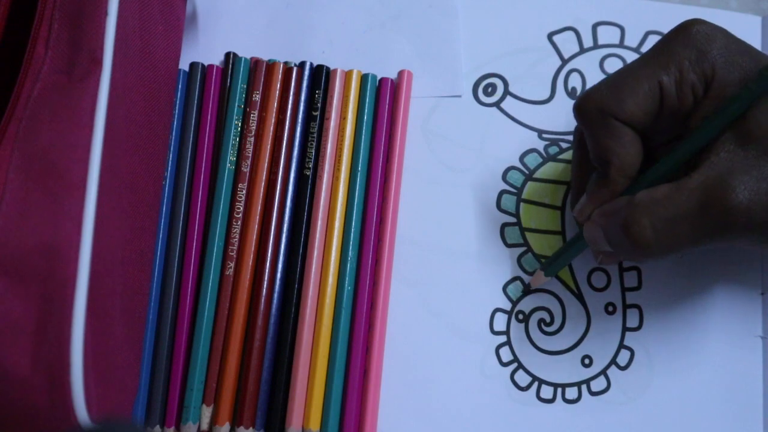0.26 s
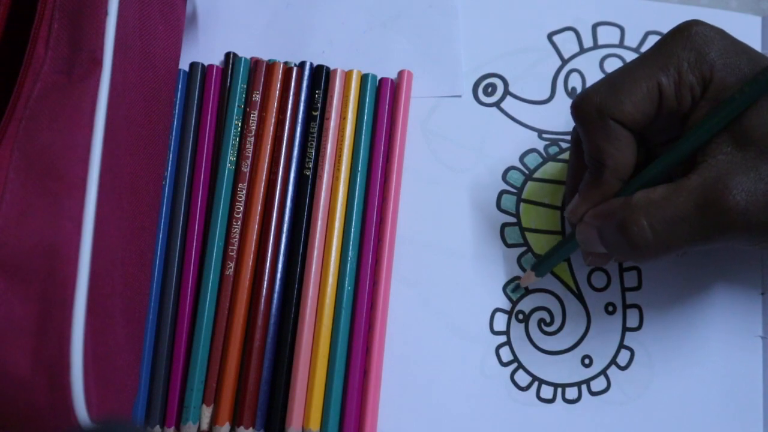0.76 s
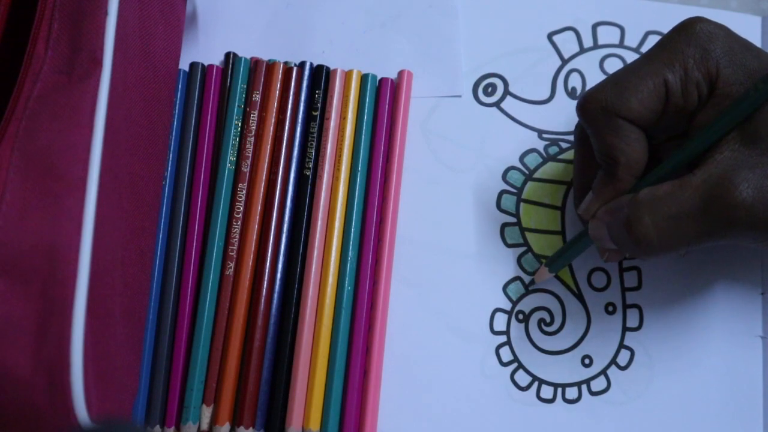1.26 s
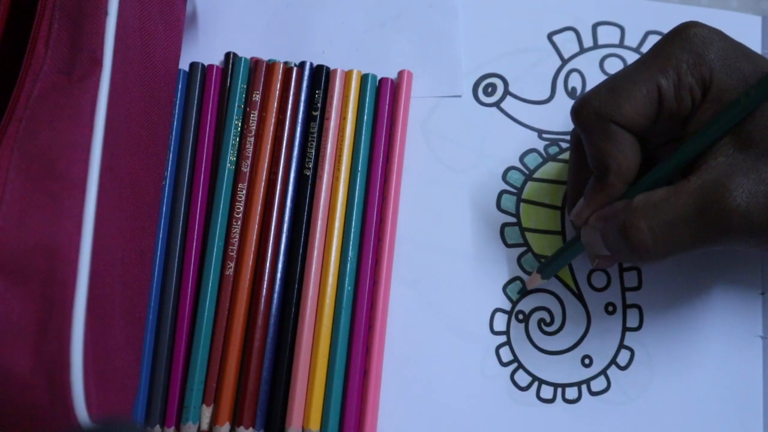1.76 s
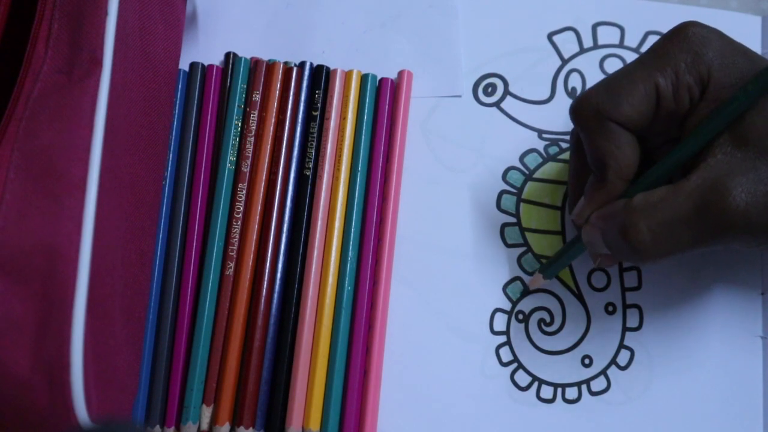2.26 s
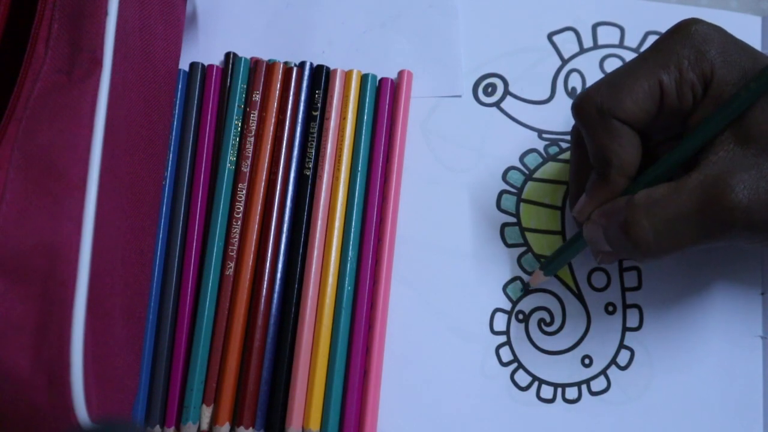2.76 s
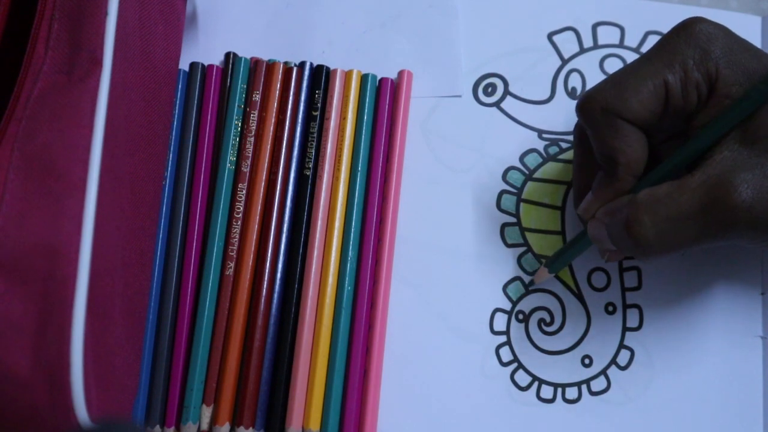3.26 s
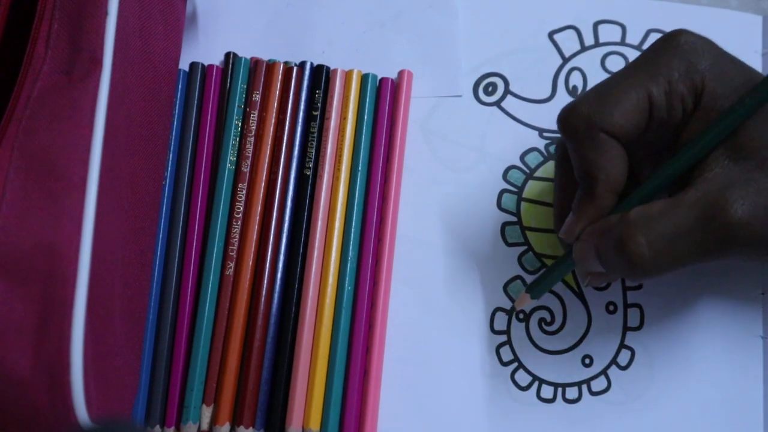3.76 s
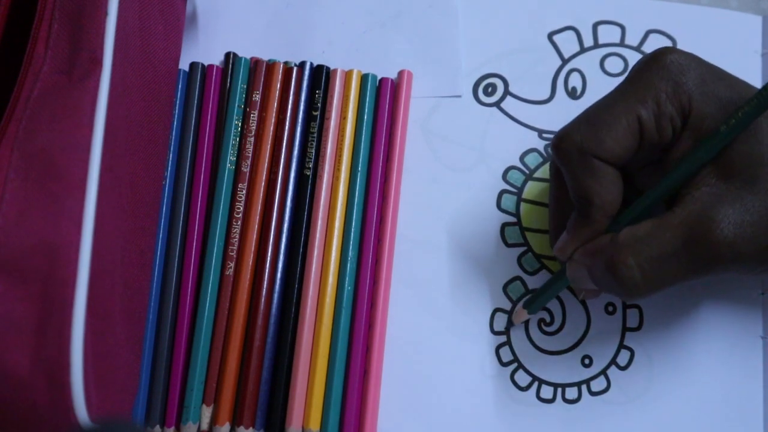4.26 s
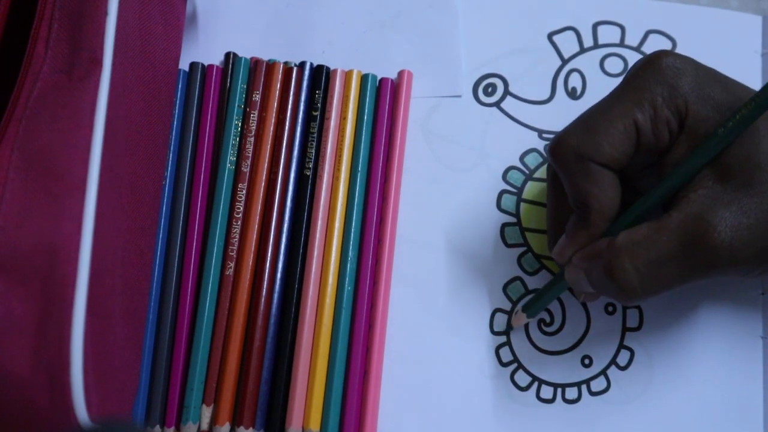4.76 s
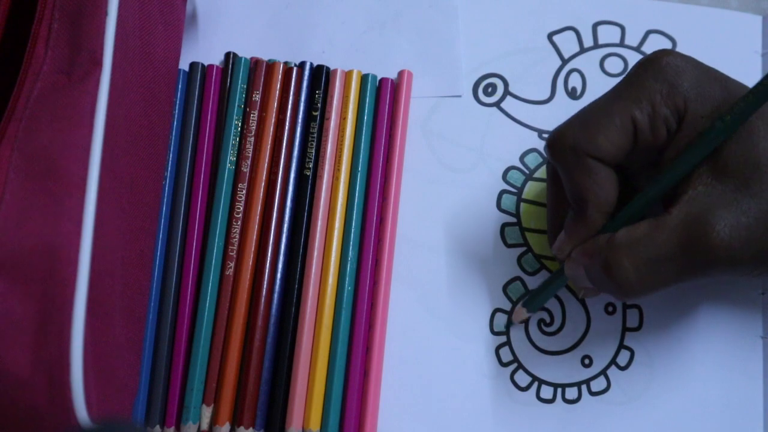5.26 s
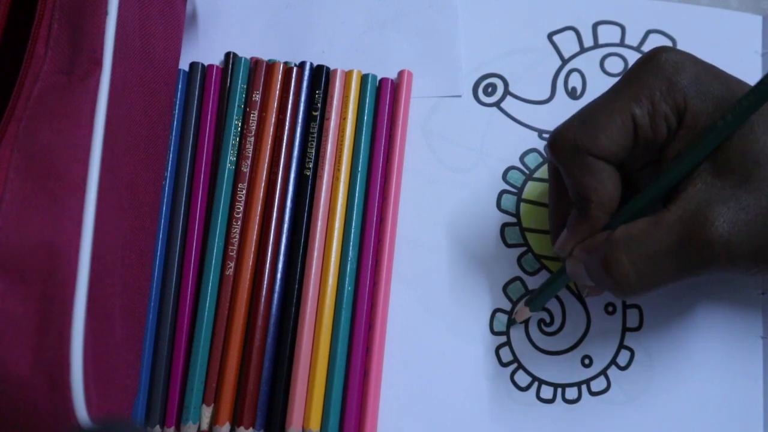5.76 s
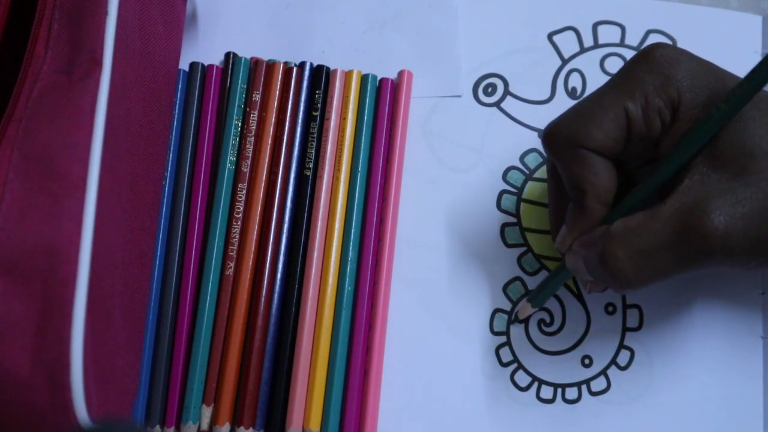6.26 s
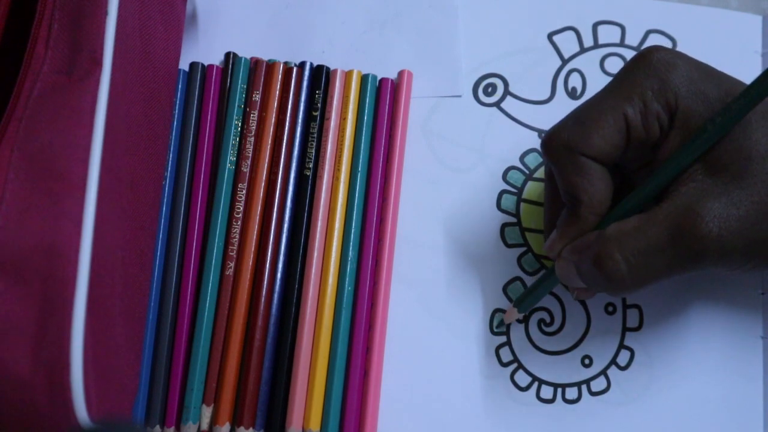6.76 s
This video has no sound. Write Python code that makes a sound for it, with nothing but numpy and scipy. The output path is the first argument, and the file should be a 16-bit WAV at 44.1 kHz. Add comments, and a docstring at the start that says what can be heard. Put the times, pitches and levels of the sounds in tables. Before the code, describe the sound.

A coloured pencil shades paper in quick, dry back-and-forth scratches, pausing briefly midway, over the soft low hum and airy rush of a fan.

```python
"""A coloured pencil shades paper on a desk, back and forth about eight times a second.
Random clicks, one per caught paper fibre, ring resonances of the lead, shaft and desk; dense echoes ripple them.
A fan adds rush (shaped noise), drones (narrow noise) and hum (sines); a dull whoosh (noise bands) passes once.
A widened stereo microphone hears it: the treble lies more in the side signal than in the middle."""
import sys
import numpy as np
from scipy import signal
from scipy.fft import rfft, irfft, next_fast_len
from scipy.io import wavfile
from scipy.ndimage import uniform_filter1d

SR = 44100
rng = np.random.default_rng(int(sys.argv[2]) if len(sys.argv) > 2 else 0)


def generate_wav(sig):
    """Save sig (samples, or channels by samples) to the path in sys.argv[1] as 16-bit PCM at SR."""
    pcm = np.round(np.clip(np.atleast_2d(sig).T, -1, 1) * 32767).astype(np.int16)
    wavfile.write(sys.argv[1], SR, pcm)


N = 309141


def gain_of(db):
    """Amplitude ratio of a level in dB."""
    return 10 ** (np.asarray(db) / 20)


def evened(x):
    """Scale to an rms of 1."""
    return x / np.sqrt(np.mean(x ** 2) + 1e-20)


def read(points, hz):
    """Interpolate a (frequency [Hz], value) curve over log frequency."""
    f, value = np.transpose(points)
    return np.interp(np.log(hz + 1), np.log(f + 1), value)


def peak(hz, centre_hz, width_hz):
    """A steep causal resonance that turns white noise of power 1 into a band of power 1."""
    return np.sqrt(2 * SR / (np.pi * width_hz)) / (1 + 2j * (hz - centre_hz) / width_hz) ** 2


def flutter(depth_db, ms):
    """A random gain that changes within about ms: smoothed noise, in dB."""
    steps = rng.standard_normal(N // 32 + 2)
    window = np.hanning(round(ms * SR / 32000) + 2)
    slow = evened(signal.oaconvolve(steps, window, "same"))
    return gain_of(depth_db * np.interp(np.arange(N) / 32, np.arange(len(slow)), slow))


def fibres():
    """Clicks of random sign and uneven size, one for each fibre that the lead catches."""
    fibres_per_s, spread_db = 7000, 3
    hit, sign = rng.random((2, N))
    size = gain_of(spread_db * np.minimum(rng.exponential(1, N), 5))
    return evened(size * np.sign(sign - 0.5) * (hit < fibres_per_s / SR))


def pressure():
    """Strength of the scraping over time for tip, edge, shaft, desk and facet; stroke powers add."""
    # strokes: (start [s], length [s], pressure [dB], drift along the stroke [dB], lean onto the edge [dB],
    # firmness into shaft and desk [dB], contact of a worn facet of the lead [dB])
    strokes = [(0.0, 0.069, -51.5, -14, -7, 1, -4), (.112, .059, -52.5, -2, -1, 1.5, -5),
               (.238, .048, -51, 5, -1, 0.5, -7), (.355, 0.074, -52, -9, -5, 1, -10),
               (0.474, 0.096, -53, -16.5, -10, 2, -7), (.613, .043, -48, 0, -2, 3, -7),
               (0.725, .056, -48.5, -10, -3, 1, -5), (0.831, .045, -48.5, -7, -3, 1, -7),
               (.94, .12, -55, -1, 3, 0, -7), (1.096, 0.059, -53.5, 0, -1, -1, -7),
               (1.258, .067, -53, 3, -2, 1, -7), (1.383, 0.036, -51, 6, -4, 3, -7),
               (1.549, .037, -57.5, .6, -3, 3, -7), (1.64, .046, -53.5, 8, 1, 1, -7),
               (1.78, .05, -53.5, -6, -4, -.5, -7), (1.887, 0.054, -51.5, 1, -2, 1, -7),
               (1.995, 0.064, -49.5, -10, -5, -2, -7), (2.123, .054, -49, -2, -6, 1, -5),
               (2.227, .094, -50.5, -4, -7, .5, -7), (2.354, 0.049, -49, 5, -3, .1, -7),
               (2.473, 0.068, -52, -5, -2, -0.5, -7), (2.608, .062, -49, -1, -1, -0.5, -7),
               (2.704, .083, -52.5, 8, 2, -1.5, -3), (2.827, .079, -51.5, 4, -1, -2, -7),
               (2.952, .069, -54.5, -1, -5, -1, -7), (3.062, 0.048, -53.5, 1, -7, .1, -6),
               (3.204, .1, -55, 9, 2, -0.5, -7), (3.354, 0.093, -57.5, -4, -2, 1.5, -7),
               (3.525, .086, -60, -10, -6, -1, 1.5), (3.646, 0.058, -63, -8, 2, 5, 4),
               (4.073, .04, -77, 5, 2.5, -2, 1.5), (4.124, .064, -59, 14, -2, -3, 2),
               (4.244, .066, -51.5, -7, -6, -1.5, 5), (4.37, 0.081, -52, -4, 6, -1, -1),
               (4.493, 0.068, -51.5, -1, -1, .6, .1), (4.636, .059, -52.5, -7, 4, 0.5, -1),
               (4.743, .069, -53.5, -4, 0, -5, 1.5), (4.882, 0.066, -54, 4, 5, .1, 2),
               (5.007, .073, -50, -10, -4, -.5, .5), (5.136, .068, -52.5, -3, 3, -1, 2),
               (5.237, 0.063, -49, -13, -5.5, -1, 2), (5.34, 0.063, -51, 11, 5, -0.5, 5),
               (5.481, .078, -51, -9, -1, -0.5, 6), (5.614, 0.072, -52, -2, 4, 2.5, 6),
               (5.735, .084, -51.5, -10, 0, .5, 2), (5.869, .073, -54, -1, 6.5, 1, 3),
               (5.999, .064, -52, -8, 0, -2, 1.5), (6.121, 0.054, -50.5, -3, 7, 0.5, 0),
               (6.216, 0.1, -53, -10, 2, -1, 1), (6.37, .062, -52, -3, 6, 2.5, 4),
               (6.499, .099, -58, -8, -3, 0, 6), (6.654, .051, -54.5, -7, 1, 2.5, 3),
               (6.75, .05, -59.5, 2.1, -11, 1, 11), (6.933, .04, -59, -11, 3, -3, 2)]
    # ringing against the tip: (at usual pressure [dB], per lean [dB/dB], per extra pressure [dB/dB])
    edge_law = (-8.5, 0.7, 0.01)
    shaft_law = (-16.5, 0.24, -0.26)
    desk_law = (-10.5, 0.46, -0.34)
    facet_law = (-8.5, 0.45, 0.01)
    # extra fade along a stroke against the tip: edge, shaft, desk, facet [dB]
    early_db = (1, -0.8, 0.9, 1)
    usual_pressure_db = -53
    arch_db = 3.5  # the hand is fastest in mid-stroke
    # times for 20 dB; strokes that grow also start more slowly
    rise_base_ms, rise_ms_per_drift_db, fall_ms = 18, 0.7, 38
    edge_loss_per_facet_db, desk_share_of_firmness = 0.35, 0.35

    t, power = np.arange(0, N + 64, 32) / SR, 0
    for start_s, length_s, db, drift_db, lean_db, firm_db, facet_db in strokes:
        along = np.clip((t - start_s) / length_s, 0, 1)
        rise_ms = max(rise_base_ms + rise_ms_per_drift_db * drift_db, 2)
        before_ms = np.maximum(start_s - t, 0) * 1000
        after_ms = np.maximum(t - start_s - length_s, 0) * 1000
        shape_db = db + drift_db * (along - 0.5) - arch_db * (2 * along - 1) ** 2
        shape_db = shape_db - 20 * (before_ms / rise_ms + after_ms / fall_ms)
        shape_db = np.maximum(shape_db, -200)
        parts_db = [usual_db + per_lean * lean_db + per_push * (db - usual_pressure_db)
                    for usual_db, per_lean, per_push in (edge_law, shaft_law, desk_law, facet_law)]
        contact_db = [-edge_loss_per_facet_db * facet_db, firm_db, desk_share_of_firmness * firm_db, facet_db]
        parts_db = np.add(parts_db, contact_db)
        fade_db = np.outer([0, *early_db], along - 0.5)
        level_db = np.add.outer([0, *parts_db], shape_db) - fade_db
        power = power + gain_of(level_db) ** 2
    return [np.interp(np.arange(N) / SR, t, np.sqrt(p)) for p in power]


def bites():
    """Strength of the bright scratch where the sharp rim of the lead bites, on some strokes only."""
    # (start [s], length [s], level [dB])
    bite_rows = [(0.112, 0.05, -57), (0.605, 0.05, -57), (0.72, 0.025, -60), (0.828, 0.03, -60),
                 (0.94, 0.037, -69), (1.377, 0.027, -67), (2.122, 0.05, -54), (2.36, 0.055, -58),
                 (2.61, 0.047, -59), (3.06, 0.03, -65), (4.24, 0.03, -63), (4.37, 0.058, -63),
                 (4.635, 0.053, -59), (4.875, 0.055, -65), (5.125, 0.06, -60), (5.239, 0.025, -62),
                 (5.357, 0.06, -64), (5.482, 0.02, -62), (5.61, 0.064, -61), (5.737, 0.022, -63),
                 (5.875, 0.06, -72), (6.0, 0.025, -63), (6.12, 0.055, -59), (6.368, 0.051, -56),
                 (6.653, 0.04, -63)]
    edge_ms = 8  # for 20 dB
    t, level = np.arange(0, N + 64, 32) / SR, 0
    for start_s, length_s, db in bite_rows:
        outside_s = np.maximum(np.maximum(start_s - t, t - start_s - length_s), 0)
        level = level + gain_of(np.maximum(db - 20 * outside_s * 1000 / edge_ms, -200))
    return np.interp(np.arange(N) / SR, t, level)


def pencil():
    """Fibre clicks and a snag ring the modes of lead, shaft and desk; returns middle and side."""
    # modes: (centre [Hz], width [Hz], side [dB], middle [dB], middle phase [rad])
    tip_modes = [(9670, 790, -8, -14, 1.8), (10210, 930, -4, -10.5, 1.44)]
    edge_modes = [(11580, 950, -5, -12.5, 1.5), (12440, 590, -3, -20, 1.7)]
    shaft_modes = [(6060, 890, -21, -5, 1.9), (6670, 780, -2, -7.5, 2.3), (7200, 300, -3, -3.5, 1.7),
                   (7600, 880, -2, -5, 1.9), (8100, 810, -6, -7.5, 1.3)]
    desk_modes = [(914, 500, -15, -5.5, 3.08), (2064, 1000, -4, -3.5, 3.42), (3170, 640, -13, -10.5, 2.7),
                  (4424, 1220, -8, -5.5, 3.2)]
    facet_modes = [(6700, 520, -11, -38, 2.7), (8800, 700, -13, -21, 1.7), (10950, 900, -2, -11, 1.8),
                   (11700, 700, -8, -14.5, 1.4)]
    rim_modes = [(12500, 630, -6, -17, 1.6), (13300, 980, -13, -12, 1.7), (14000, 700, -10, -7, 1.7),
                 (15200, 1200, -13, -8, 1.5)]
    # share of the middle's power from a separate, scattered copy: tip, edge, shaft, desk, facet, rim [0..1]
    scattered = [0.38, 0.3, 0.63, 0.71, 0.3, .3]
    # waver of each mode: tip, edge, shaft, desk, facet, rim [dB]
    mode_waver_db = (1.8, 1.7, 2.5, 1.3, 1.9, 1.7)
    # the lead snags while the hand moves on: (time [s], impulse level [dB])
    snag_rows = [(3.796, -42)]
    rim_under_edge_db = -18

    size = next_fast_len(N + 4096)
    hz, clicks = np.fft.rfftfreq(size, 1 / SR), fibres()
    grain = flutter(depth_db=1.2, ms=6.0)  # the grain of the paper shakes the whole pencil
    snags = np.zeros(N)
    for time_s, db in snag_rows:
        snags[round(time_s * SR)] = gain_of(db)

    tip, edge, shaft, desk, facet = pressure()
    rim = bites() + gain_of(rim_under_edge_db) * edge
    part_modes = (tip_modes, edge_modes, shaft_modes, desk_modes, facet_modes, rim_modes)
    drives = (tip, edge, shaft, desk, facet, rim)
    middle, side = 0, 0
    for modes, share, drive, waver_db in zip(part_modes, scattered, drives, mode_waver_db):
        snag = snags * (modes is not desk_modes)  # the snag does not ring the desk
        for centre_hz, width_hz, side_db, middle_db, phase_rad in modes:
            # each mode's level wavers at random
            push = drive * grain * flutter(depth_db=waver_db, ms=45.0)
            shifts = rng.integers(0, N, size=2)  # two unlike click streams from one
            a, b = (rfft(np.roll(clicks, shift) * push + snag, size) for shift in shifts)
            ring = peak(hz, centre_hz, width_hz)
            side = side + gain_of(side_db) * ring * a
            both = np.sqrt(1 - share) * a + np.sqrt(share) * b
            middle = middle + gain_of(middle_db) * np.exp(1j * phase_rad) * ring * both
    return irfft(np.array([middle, side]), size)[:, :N]


def rippled(x, echo_db, t60_s, turns_per_s):
    """Dense random echoes ripple the colour; two sets trade places at a steady rate."""
    at = np.arange(22, 4400, 22) + rng.integers(0, 22, size=(2, 199))  # one tap each half millisecond
    taps = np.zeros((2, 4500))
    tap_gains = rng.choice([-1., 1.], size=at.shape) * gain_of(-60 * at / SR / t60_s)
    np.put_along_axis(taps, at, tap_gains, axis=1)
    taps = gain_of(echo_db) * taps / np.linalg.norm(taps[0])
    angle = 2 * np.pi * turns_per_s * np.arange(N) / SR
    first = signal.oaconvolve(x * np.cos(angle), taps[:1], axes=1)
    second = signal.oaconvolve(x * np.sin(angle), taps[1:], axes=1)
    return x + (first + second)[:, :N]


def rush():
    """Air noise in middle and side: random short-time spectra with faint drifting patches."""
    # relative spectra: (frequency [Hz], density [dB])
    middle_curve = [(18, -34), (33, -21), (42, -2), (76, -6), (177, -6), (460, -10.5), (537, -12),
                    (644, -15.5), (1050, -17.5), (4330, -30.5), (5460, -34.5), (7440, -38), (8690, -40.5),
                    (10100, -41), (11800, -45), (14200, -76)]
    side_curve = [(18, -65), (30, -37), (84, -9), (134, -1), (282, 2.5), (472, 2.5), (2270, -5),
                  (6060, -15), (6710, -18), (8460, -20), (10100, -21), (11800, -30), (13400, -27),
                  (14600, -36), (15700, -42)]
    # (frequency [Hz], likeness of side to middle [-1..1], minus = right)
    likeness = [(100, 0.0), (600, -0.06), (3000, -.1), (9000, 0.024)]
    middle_rms_db, side_rms_db, patch_db = -50.5, -51, 0.67

    frames, hz = N // 512 + 5, np.fft.rfftfreq(2048, 1 / SR)
    a, b, c, d, patches = rng.standard_normal((frames, 1025, 5)).T
    patches = uniform_filter1d(patches, 30, 0)
    patches = evened(uniform_filter1d(patches, 8, 1))
    alike = read(likeness, hz)[:, None]
    middle_noise, other_noise = a + 1j * b, c + 1j * d
    side_noise = alike * middle_noise + np.sqrt(1 - alike ** 2) * other_noise
    colour_db = np.array([read(middle_curve, hz), read(side_curve, hz)])[:, :, None]
    spectra = np.array([middle_noise, side_noise]) * gain_of(colour_db + patch_db * patches)
    middle, side = signal.istft(spectra, nperseg=2048, noverlap=1536)[1][:, :N]
    return np.array([gain_of(middle_rms_db) * evened(middle), gain_of(side_rms_db) * evened(side)])


def fan():
    """Rush plus drones and hum, which are low, reach both capsules alike and so stay in the middle."""
    # fuzzy tones: (centre [Hz], width [Hz], level [dB])
    drone_rows = [(85.9, 4.3, -62.5), (92.9, 14, -60.5), (387.3, 72, -65), (129.9, 14, -66.5),
                  (144.9, 10.2, -64.5), (238.8, 59, -64.5), (263.4, 22, -64), (306.7, 18, -71.5),
                  (516.8, 26, -66.5), (544.4, 12, -65.5)]
    # wavering low hum: (time [s], level [dB])
    hum_levels = [(0.0, -44), (0.19, -68), (0.28, -56), (0.66, -44.5), (0.96, -52), (1.03, -60),
                  (1.64, -58), (1.9, -65), (2.18, -51), (2.97, -45.5), (3.73, -43.5), (4.4, -48),
                  (4.52, -45), (4.74, -51), (4.84, -67), (4.9, -53.5), (6.5, -43.5), (7.01, -49.5)]
    # steadier hums: (frequency [Hz], level [dB], waver [dB])
    even_hums = [(76.74, -55.5, 2.0), (97.16, -61.5, 3.0)]
    hum_hz = 48.95

    hz, t = np.fft.rfftfreq(N, 1 / SR), np.arange(N) / SR
    drones = sum(gain_of(db) * peak(hz, centre_hz, width_hz) * rfft(rng.standard_normal(N))
                 for centre_hz, width_hz, db in drone_rows)
    turns = np.cumsum(hum_hz * flutter(depth_db=-0.1, ms=250.0)) / SR  # its pitch strays a little
    hum = gain_of(np.interp(t, *np.transpose(hum_levels))) * np.sin(2 * np.pi * turns)
    steady = sum(gain_of(db) * flutter(depth_db=waver_db, ms=160.0) * np.sin(2 * np.pi * tone_hz * t)
                 for tone_hz, db, waver_db in even_hums)
    low = irfft(drones, N) + np.sqrt(2) * (hum + steady)  # sqrt(2): rms to sine peak
    return rush() + low * np.array([[1], [0]])


def whoosh():
    """Noise in a few broad bands swells and fades; the side partly opposes the middle."""
    # (time [s], level [dB])
    swell_points = [(2.501, -35), (2.64, -7), (2.72, -2), (2.9, -3), (2.98, -7), (3.15, -36)]
    # (centre [Hz], width [Hz], middle [dB], side [dB])
    bands = [(270, 80, -53.5, -65), (528, 240, -53.5, -62), (1200, 570, -60.5, -55),
             (1750, 300, -66.5, -59), (2280, 540, -64.5, -54)]
    hz, (time_s, db) = np.fft.rfftfreq(N, 1 / SR), np.transpose(swell_points)
    swell = gain_of(np.interp(np.arange(N) / SR, time_s, db, left=-99, right=-99))
    out = 0
    for centre_hz, width_hz, *pair_db in bands:
        a, b = rfft(rng.standard_normal((2, N)) * swell)
        pair = np.array([a, 0.68 * b - 0.71 * a])
        out = out + gain_of(pair_db)[:, None] * peak(hz, centre_hz, width_hz) * pair
    return irfft(out, N)


def scene():
    """Sum the sources as middle and side, then turn them into left and right."""
    shading = rippled(pencil(), echo_db=-6.0, t60_s=0.11, turns_per_s=1.31)
    middle, side = shading + fan() + whoosh()
    return np.array([middle + side, middle - side])


def record(dry):
    """The deepest bass is cut and the middle is dulled at the top; then the band limit."""
    bass_cut_hz, middle_top_hz, cutoff_hz = 34, 12560, 15760
    dry = signal.sosfilt(signal.butter(N=3, Wn=bass_cut_hz, btype="high", fs=SR, output="sos"), dry)
    middle, side = (dry[0] + dry[1]) / 2, (dry[0] - dry[1]) / 2
    # the middle loses its treble earlier than the side
    middle = signal.oaconvolve(middle, signal.firwin(numtaps=35, cutoff=middle_top_hz, fs=SR), "same")
    pair = np.array([middle + side, middle - side])
    band_limit = signal.firwin(1023, cutoff_hz, window=("kaiser", 9), fs=SR)
    return signal.oaconvolve(pair, band_limit[None], "same")


dry = scene()
out = record(dry)
generate_wav(out)
```